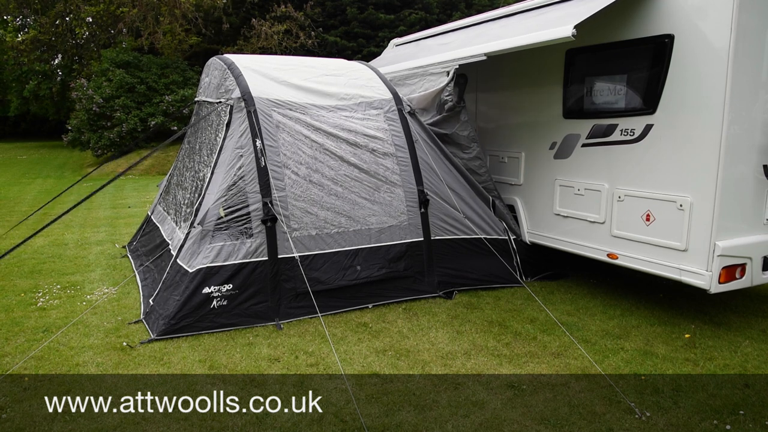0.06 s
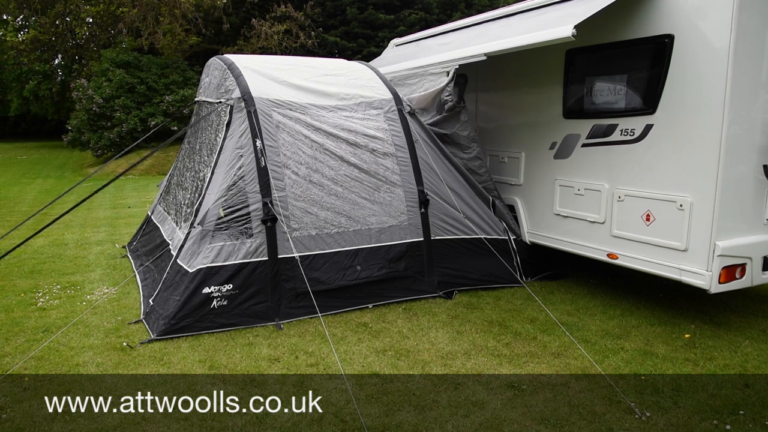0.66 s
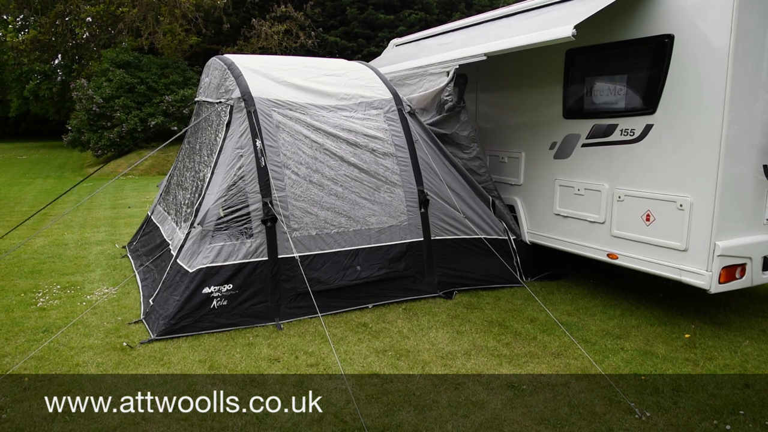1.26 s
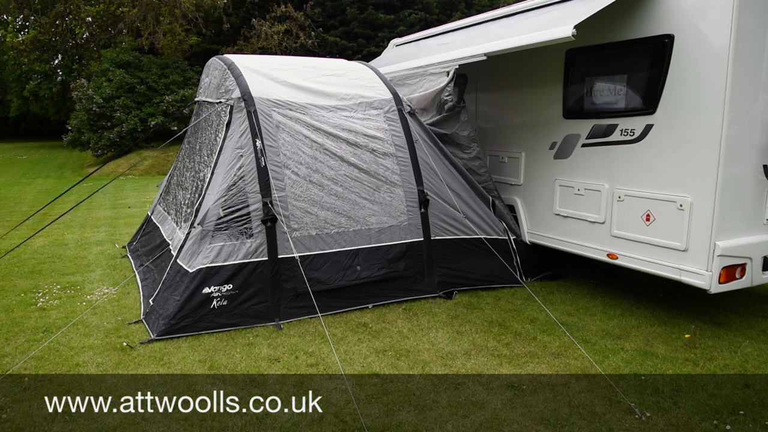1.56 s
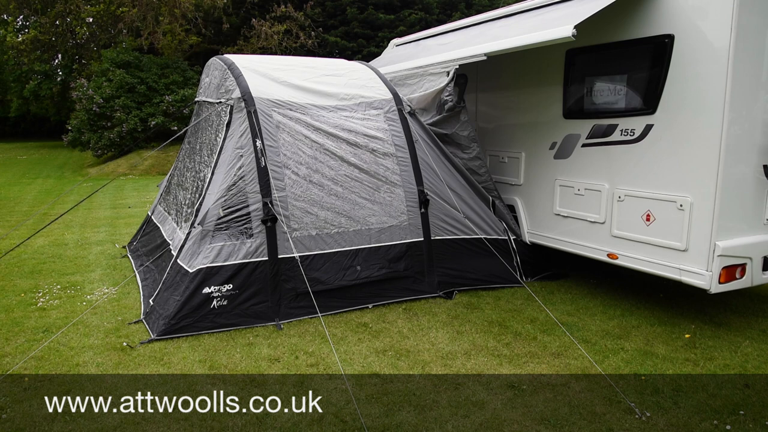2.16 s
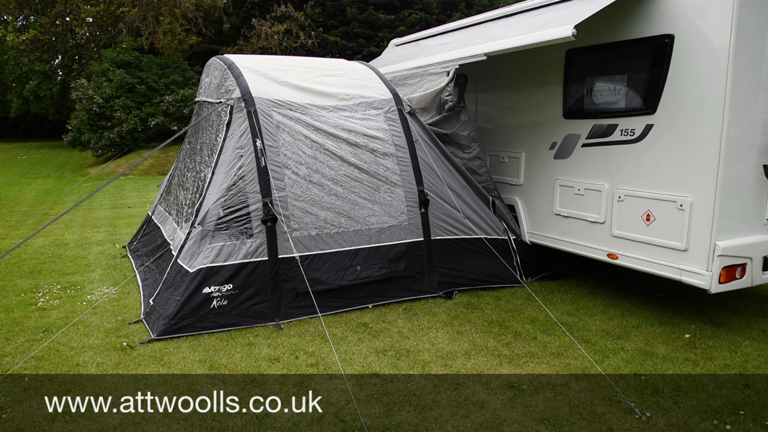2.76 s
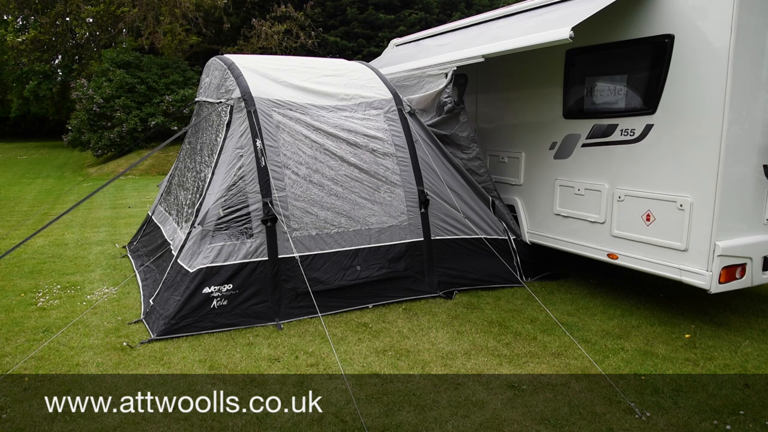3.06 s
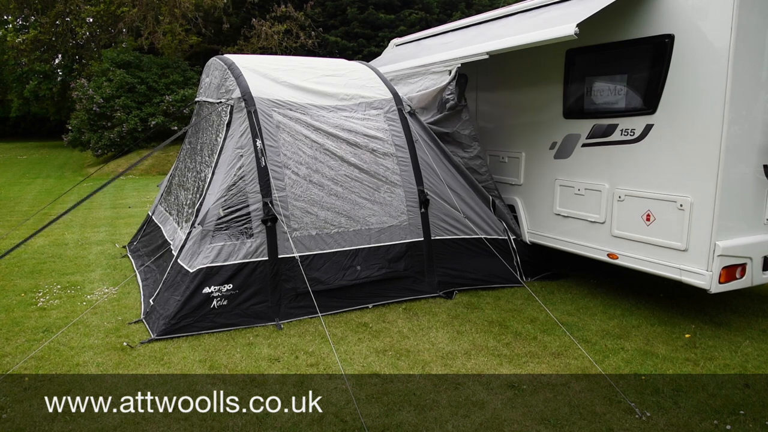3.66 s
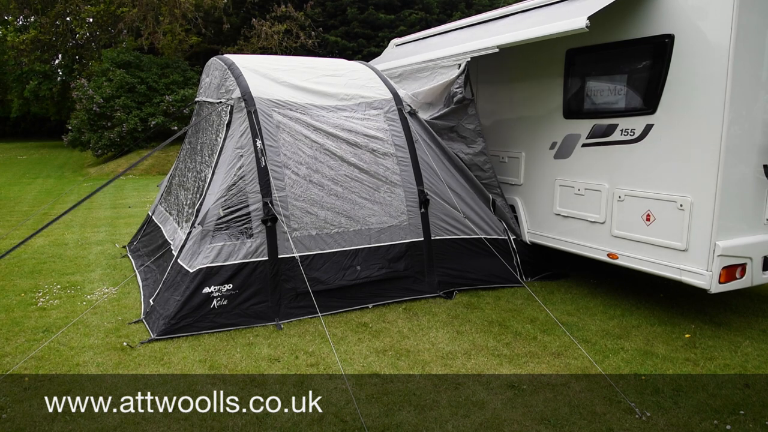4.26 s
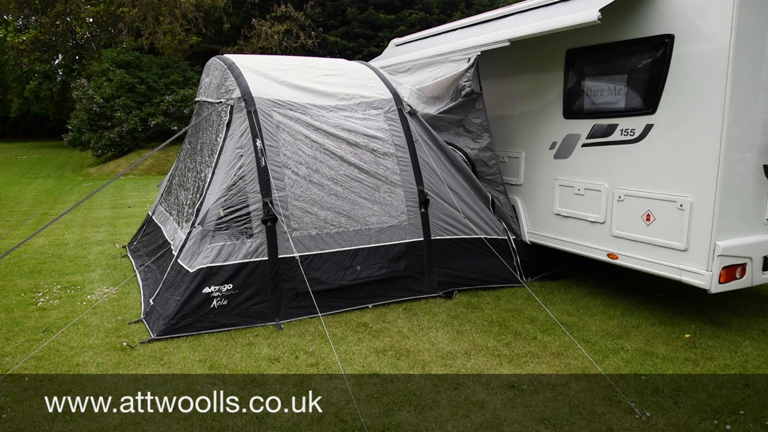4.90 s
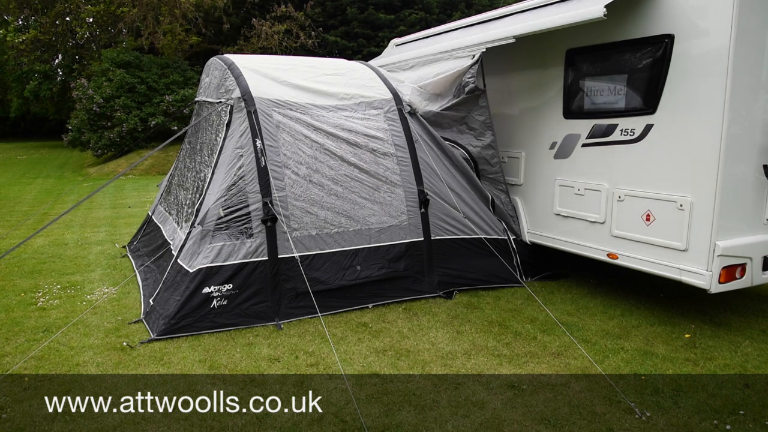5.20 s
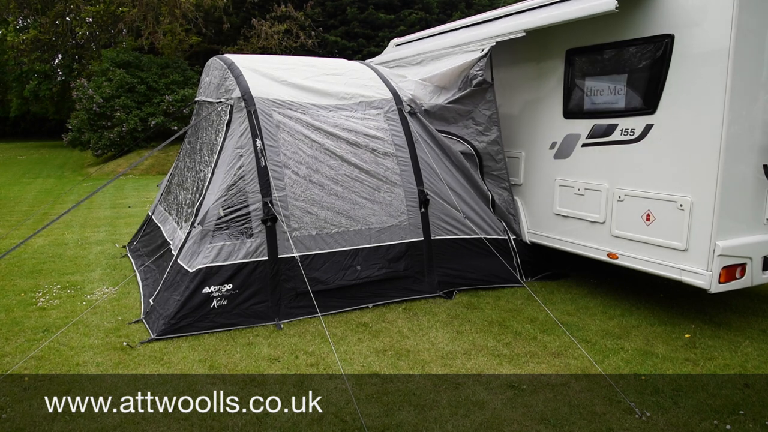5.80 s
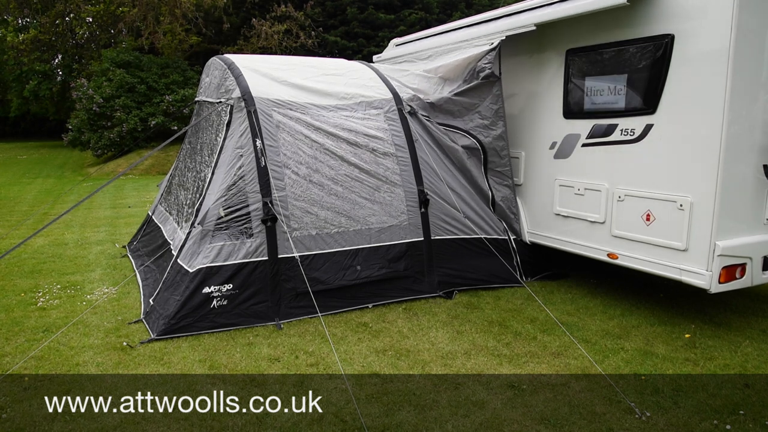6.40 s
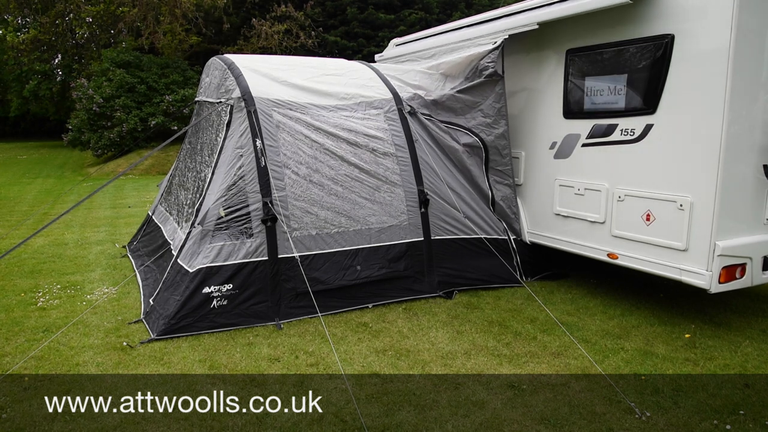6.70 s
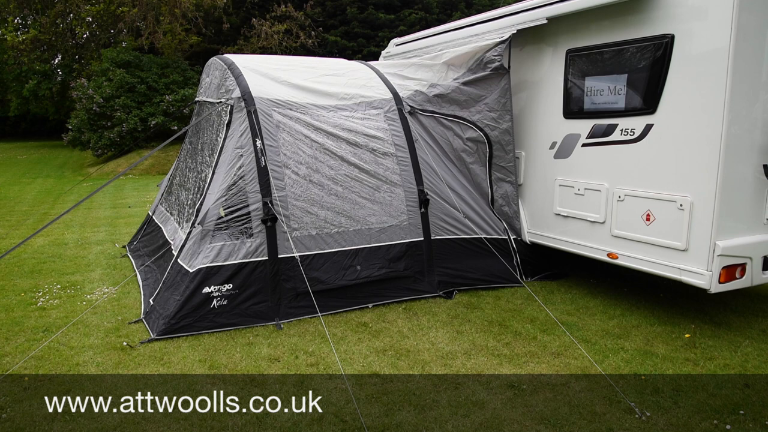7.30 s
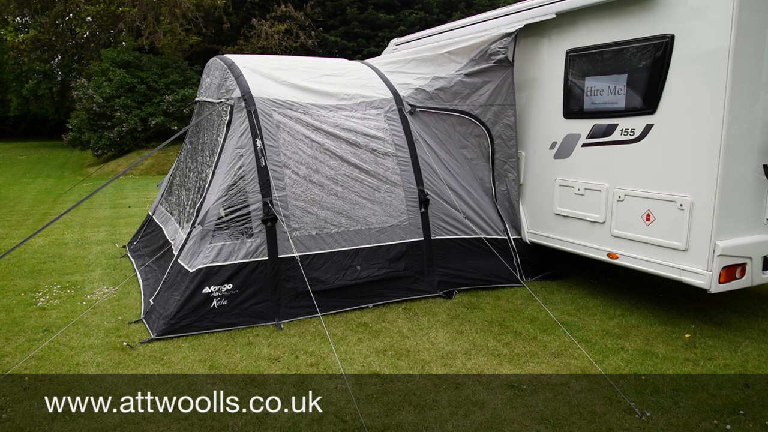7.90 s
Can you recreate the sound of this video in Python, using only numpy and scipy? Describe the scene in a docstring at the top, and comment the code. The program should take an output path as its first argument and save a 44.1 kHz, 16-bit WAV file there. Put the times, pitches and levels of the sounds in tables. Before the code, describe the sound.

A metal pole clinks and hooks on, then an awning is hand-cranked in with rhythmic clacks, grinding and rustling canvas.

```python
"""A metal crank pole clinks as it is picked up, over the faint murmur of a quiet lawn.
Its hook rattles into the eye of a caravan awning's gearbox, and the awning is wound in by hand.
At about three pushes a second, gear teeth clack and click, the gear grinds and the roller rumbles
in its case. The canvas slides and rustles, its creases snapping as they wrap round the roller."""
import sys
import numpy as np
from scipy import signal
from scipy.fft import rfft, irfft, next_fast_len
from scipy.io import wavfile
from scipy.ndimage import map_coordinates

SR = 44100
rng = np.random.default_rng(int(sys.argv[2]) if len(sys.argv) > 2 else 0)


def wrap_up_sound(samples):
    """Save the sound to the file named by the first command line argument, as 16-bit audio."""
    columns = np.atleast_2d(samples).T
    # keep every value between -1 and 1, then stretch to whole-number steps
    tamed = np.clip(columns, -1, 1)
    steps = np.round(tamed * 32767).astype(np.int16)
    wavfile.write(sys.argv[1], SR, steps)


N = 355005


def amp(db):
    return 10 ** (np.asarray(db) / 20)


def unit(x, start_s=0, end_s=None):
    """x scaled to rms 1 between two times."""
    part = x[int(start_s * SR):None if end_s is None else int(end_s * SR)]
    return x / np.sqrt(np.mean(part ** 2) + 1e-20)


def curves(rows):
    """Per-sample dB for each column after the time; -120 before the first row."""
    times_s, *columns = np.transpose(rows)
    return [np.interp(np.arange(N) / SR, times_s, column, left=-120) for column in columns]


def wobble(rate_hz):
    """Smooth random curve with rate_hz knots a second."""
    knots = rng.standard_normal(int(N * rate_hz / SR) + 4)
    return map_coordinates(knots, [np.arange(N) * rate_hz / SR])


def impulse_response(spectrum, size):
    """Minimum-phase filter through (Hz, dB) points."""
    hz, db = np.transpose(spectrum)
    gain = amp(np.interp(np.log(np.fft.rfftfreq(size, 1 / SR) + 1), np.log(hz), db))
    cepstrum = irfft(np.log(gain), size)
    cepstrum[1:size // 2] *= 2
    cepstrum[size // 2 + 1:] = 0
    return irfft(np.exp(rfft(cepstrum)))


def coloured(x, spectrum, size=4096):
    """x filtered to a spectrum."""
    return signal.fftconvolve(x, impulse_response(spectrum, size))[:len(x)]


def resonance(x, centre_hz, q):
    return signal.lfilter(*signal.iirpeak(centre_hz, q, fs=SR), x)


def fade(t, t60_s):
    return np.exp(-np.log(1000) * t / t60_s)


def swell(peak_s, rise_s, fall_s):
    """Rises to a rounded peak of 1 and dies away."""
    t = np.arange(N) / SR - peak_s
    distance = np.maximum(-t / rise_s, t / fall_s)
    return 1 / np.cosh(np.minimum(distance, 20))


def grains(rate_hz, spread_db):
    """Tiny slips at random moments, a few much larger than the rest; rms 1."""
    occurs = rng.random(N) < rate_hz / SR
    size_db = spread_db * np.minimum(rng.exponential(size=N), 4)
    sign = rng.choice([-1, 1], N)
    return unit(occurs * sign * amp(size_db))


# Spectra of a blow's crack, treble and knock. Each row: frequency in Hz, relative gain in dB.
CRACK_SPECTRUM = [(300, -26.5), (900, -20.5), (1500, 1.5), (2700, 2), (4200, -1), (5300, -7), (6500, -18),
                  (9000, -50.5)]
TREBLE_SPECTRUM = [(3500, -46.5), (5000, 6.5), (6100, 3), (7800, 2.5), (9700, -0.5), (11000, -4),
                   (12400, -1), (13600, -5.5), (16000, -13.5)]
KNOCK_SPECTRUM = [(30, -35), (70, -37), (100, -28), (135, -4), (185, -7.5), (235, 1), (310, -4.5),
                  (420, -5.5), (650, -7.5), (900, -7.5), (1300, -8.5), (2000, -13.5), (4000, -51.5)]


def metal_contacts(rows, modes, *, clank, zing, boom, snap, ping,
                   treble_t60_s, wash_t60_s, knock_t60_s, favour_db, gain_db):
    """Metal meets metal: a crack, a treble burst, the ring of the part and a knock of its mount."""
    t = np.arange(SR // 4) / SR
    attack_s, ring_s = (0, 0.004), (0.006, 0.02)  # windows in which levels are set
    blow = snap * (np.arange(len(t)) == 8)
    onset = 1 - np.exp(-t / 0.0016)
    hz, mode_db, t60_s = np.transpose(modes)
    partials = amp(mode_db)[:, None] * fade(t, t60_s[:, None]) * np.exp(2j * np.pi * hz[:, None] * t)
    high = hz > 5500
    out = np.zeros(N + SR)
    for start_s, crack_db, treble_db, ring_db, knock_db, favoured_hz, contact_s in rows:
        crack_noise, treble_noise, wash_noise, knock_noise = rng.standard_normal((4, len(t)))
        # Each struck spot excites its own share of the modes.
        scatter, phase = rng.standard_normal((2, len(modes)))
        nearness = np.exp(-(np.log(hz / favoured_hz) / 0.15) ** 2)
        share = amp(2.2 * scatter + favour_db * nearness) * np.exp(2j * np.pi * phase)
        tones = ((share * ~high) @ partials).imag
        overtones = ((share * high) @ partials).imag
        # A short contact snaps; a long one scrapes and starts softly.
        impulse = blow * 0.019 / contact_s
        touch = 1 - np.exp(-t / (0.009 * contact_s))
        contact = touch * fade(t, contact_s)
        crack = coloured(impulse + crack_noise * contact, CRACK_SPECTRUM, size=2048)
        crack += ping * resonance(crack, favoured_hz, q=7.5)
        crack = unit(crack, *attack_s) + clank * unit(tones * contact, *attack_s)

        treble_decay = fade(t, np.sqrt(contact_s * treble_t60_s)) + 0.05 * fade(t, 0.16)
        treble = coloured(impulse + treble_noise * touch * treble_decay, TREBLE_SPECTRUM, size=2048)
        hardness = amp(0.28 * min(treble_db + 44, 0))  # soft blows barely wake the highest modes
        treble = unit(treble, *attack_s) + zing * hardness * unit(overtones * touch, *attack_s)
        # The thin wall's many weak modes blur into a wash.
        wash = coloured(wash_noise * fade(t, wash_t60_s), CRACK_SPECTRUM, size=2048)
        ring = onset * (unit(tones, *ring_s) + amp(-8) * unit(wash, *ring_s))

        knock = coloured(knock_noise * onset * fade(t, knock_t60_s), KNOCK_SPECTRUM, size=2048)
        knock += boom * resonance(knock, centre_hz=238, q=7)  # hollow case

        hit = amp(crack_db) * unit(crack, *attack_s) + amp(treble_db) * unit(treble, *attack_s)
        hit += amp(ring_db) * unit(ring, *ring_s) + amp(knock_db) * unit(knock, end_s=0.02)
        out[round(start_s * SR):][:len(t)] += hit
    return amp(gain_db) * out[:N]


# Pole clinks. Each row: start in seconds, crack, treble and ring in relative dB,
# favoured pitch in Hz, contact in seconds.
POLE_HITS = [(0.0274, -58, -75.5, -76, 2000, 0.035), (0.121, -52, -77, -69.5, 1850, 0.027),
             (0.1305, -47, -73, -66, 1860, .025), (0.2976, -43, -33.5, -40.5, 1600, .018),
             (0.2992, -23.5, -30.5, -43.5, 4050, .013), (0.3235, -40.5, -54, -48.5, 2800, .028),
             (0.3456, -59, -62, -46.5, 2800, .03), (0.426, -54.5, -64.5, -71, 3150, .038),
             (0.7508, -60.5, -75, -72, 2810, 0.046), (0.9024, -40.5, -48, -70.5, 3100, 0.044),
             (0.9112, -41.5, -43.5, -56, 3040, 0.11), (1.06, -56.5, -66.5, -66.5, 4120, 0.015),
             (1.1513, -53.5, -58.5, -62, 2360, 0.079)]
# Pole modes. Each row: frequency in Hz, relative level in dB, t60 in seconds.
POLE_RING = [(520, -10.5, .04), (1275, -11.5, 0.46), (1600, -3.5, 0.06), (1650, -20, .25), (2510, -5, 0.11),
             (2769, 1.5, 0.14), (3045, -5, .08), (3230, -7.5, 0.24), (3600, -2.5, .11), (3700, -9, .06),
             (4050, -13.5, 0.05), (4770, -7.5, 0.055), (5680, -8, 0.065), (6400, -17.5, .06),
             (6530, -16, 0.078), (7050, -26.5, .07), (7900, -25, .05), (9300, -1.5, 0.017),
             (10800, -12, 0.037), (12600, -14.5, .04), (13180, -12.5, .03)]


def pole():
    """The loose pole clinks as it is picked up; the hand damps its knock and it radiates no bass."""
    rows = []
    for start_s, crack_db, treble_db, ring_db, favoured_hz, contact_s in POLE_HITS:
        knock_db = -60.5 + 0.19 * (crack_db + 40)
        rows.append((start_s, crack_db, treble_db, ring_db, knock_db, favoured_hz, contact_s))
    clinks = metal_contacts(
        rows, POLE_RING, clank=1.3, zing=0.9, boom=0.1, snap=2, ping=0.5,
        treble_t60_s=0.012, wash_t60_s=0.09, knock_t60_s=0.039, favour_db=14, gain_db=-1)
    return signal.sosfilt(signal.butter(2, 570, "high", fs=SR, output="sos"), clinks)


# Outdoor air. Each row: frequency in Hz, relative gain in dB.
AIR_SPECTRUM = [(25, -37), (50, -43), (79, -21.5), (100, -14.5), (125, -6.5), (165, -3), (235, -0.5),
                (310, -7), (650, -11), (1050, -11), (1700, -20.5), (3000, -29), (8000, -41), (15500, -42.5)]


def outdoors():
    """Distant, steady murmur of air and trees."""
    level_db = -60.5 + 0.6 * wobble(rate_hz=4)
    return amp(level_db) * unit(coloured(rng.standard_normal(N), AIR_SPECTRUM))


# Rubs of pole and cloth. Each row: peak in seconds, slide and rustle in relative dB, fall in seconds.
CLOTH_RUBS = [(0.05, -69, -82, 0.073), (0.47, -70, -73.5, 0.22), (1.152, -74, -77, 0.16),
              (2.151, -62, -76, .025), (2.265, -51, -63.5, 0.04), (2.48, -73.5, -80, 0.29),
              (2.789, -61, -68, 0.029), (3.006, -52.5, -57, 0.056)]
# Canvas drawn in. Each row: time in seconds, slide and rustle in relative dB.
CLOTH_LEVELS = [(3.3, -70, -74), (3.48, -61.5, -63.5), (4.08, -57, -62), (4.6, -62.5, -66),
                (5.8, -59.5, -67.5), (6.55, -62.5, -69.5), (6.97, -69, -68.5), (7.6, -59.5, -73.5),
                (8.05, -67, -76)]
# Swish of smooth cloth and snapping of creases. Each row: time in seconds, relative level in dB.
SWISH_LEVELS = [(2.38, -100), (2.46, -73), (2.58, -70), (2.68, -80), (2.73, -59.5), (2.77, -78),
                (2.85, -100)]
CREASE_LEVELS = [(3.3, -61), (3.7, -66.5), (4.7, -64.5), (5.6, -67.5), (6.07, -60), (6.6, -62.5),
                 (6.95, -70.5), (7.2, -64), (7.85, -62.5), (8.05, -74)]
# Cloth spectra. Each row: frequency in Hz, relative gain in dB.
SLIDE_SPECTRUM = [(700, -42.5), (1400, 3), (1900, 7.5), (2700, 1.5), (3800, -2.5), (5000, -8.5),
                  (7000, -24), (11000, -29)]
RUSTLE_SPECTRUM = [(2500, -3), (5500, 7.5), (7500, 2.5), (10000, -0.5), (12500, -4), (14500, -16.5),
                   (16000, -15)]
SWISH_SPECTRUM = [(5000, -33.5), (8000, -5), (10000, -3.5), (11000, 1), (11700, -3), (12500, 0.5),
                  (13400, 3), (16000, -2.5)]
CREASE_SPECTRUM = [(1200, -45), (2200, 5), (3300, 6), (4300, 3), (5000, -4.5), (6400, -3.5), (9000, -11.5),
                   (11200, -7.5), (13500, -14), (16000, -16)]


def canvas(roller_db):
    """Canvas slides, rustles and swishes; its creases crackle as it wraps round the roller."""
    pull_db = 0.19 * np.clip(roller_db + 45.5, -8, 8) + stall_db()  # each push drags more cloth in
    slide_gain, rustle_gain = amp(curves(CLOTH_LEVELS)) * amp(0.5 * pull_db)
    for peak_s, slide_db, rustle_db, fall_s in CLOTH_RUBS:
        rub = swell(peak_s, rise_s=0.016, fall_s=fall_s)
        slide_gain += amp(slide_db) * rub
        rustle_gain += amp(rustle_db) * rub
    flutter_db = 2.2 * wobble(rate_hz=21)
    flutter = amp(flutter_db - 2.5)
    slide = slide_gain * flutter * unit(coloured(rng.standard_normal(N), SLIDE_SPECTRUM))
    rustle = rustle_gain * flutter * unit(coloured(rng.standard_normal(N), RUSTLE_SPECTRUM))

    swish_db, = curves(SWISH_LEVELS)
    swish = amp(swish_db + flutter_db) * unit(coloured(rng.standard_normal(N), SWISH_SPECTRUM))

    crease_db, = curves(CREASE_LEVELS)
    snaps = np.abs(grains(rate_hz=130, spread_db=3.1))
    bursts = signal.fftconvolve(snaps, fade(np.arange(SR // 25) / SR, t60_s=0.011))[:N]
    crackle = unit(coloured(bursts * rng.standard_normal(N), CREASE_SPECTRUM))
    return slide + rustle + swish + amp(crease_db + pull_db) * crackle


# Hook on eye. Each row: start in seconds, crack, treble, ring and knock in relative dB,
# favoured pitch in Hz.
HOOK_HITS = [(1.8214, -45, -61, -45.5, -43, 1240), (1.8392, -38.5, -51, -53, -44, 3060),
             (1.8547, -46, -56, -51.5, -43.5, 3200), (1.9366, -41.5, -63, -50, -48.5, 2720),
             (1.965, -39.5, -59, -61, -53, 4120), (1.9775, -37, -54, -55, -42, 2310),
             (1.9886, -40, -51.5, -46.5, -53, 3020), (2.1469, -51, -72, -62, -49.5, 2000),
             (2.1602, -31, -47.5, -49, -42.5, 2920), (2.1743, -34, -42, -39, -55, 3380),
             (2.1832, -38, -47, -49, -46, 3900), (2.2743, -43, -56, -45, -47.5, 2590),
             (2.2866, -33.5, -45, -42.5, -38.5, 3230), (2.2922, -34, -42, -61, -59, 3250),
             (2.4463, -47, -59.5, -64, -56.5, 3000), (2.7668, -26, -40.5, -50.5, -55, 2620),
             (2.8945, -37.5, -59, -73, -70, 2560)]
# Hook modes. Each row: frequency in Hz, relative level in dB, t60 in seconds.
HOOK_RING = [(760, -10, 0.56), (997, -2.5, 0.15), (1247, 0.5, .1), (1320, -13, 0.34), (1671, 0, 0.1),
             (2660, -6, 0.077), (3200, 2, 0.079), (3960, 3.5, 0.053), (4970, -19, 0.048),
             (5580, -13, 0.048), (5930, -18, .05), (7380, -19.5, 0.08), (10100, -10, 0.017)]


def hook(contact_s=0.028):
    """The hook rattles into the eye of the gearbox and knocks the case."""
    rows = [(*hit, contact_s) for hit in HOOK_HITS]
    return metal_contacts(
        rows, HOOK_RING, clank=0.37, zing=0.92, boom=0.69, snap=12, ping=1.0,
        treble_t60_s=0.1, wash_t60_s=0.17, knock_t60_s=0.21, favour_db=10, gain_db=-2)


# Handle pushes. Each row: time in seconds, roller, grind and clack in relative dB.
HANDLE_PUSHES = [(2.4223, -57, -61, -56), (2.61, -54, -60, -66), (2.9102, -69, -53, -46.5),
                 (3.0227, -49, -53, -46), (3.34, -49.5, -49, -46), (3.4215, -39, -40.5, -41),
                 (3.8309, -44.5, -45, -44), (4.1643, -46.5, -48.5, -44), (4.4783, -43, -46.5, -43.5),
                 (4.8258, -49, -43, -43), (5.1732, -44, -49.5, -45.5), (5.4818, -44, -47.5, -46.5),
                 (5.7945, -44.5, -51, -44.5), (6.1054, -45, -48, -38.5), (6.4135, -43, -56, -45.5),
                 (6.912, -53, -53, -58), (7.2, -47.5, -48, -62), (7.535, -44, -51.5, -49),
                 (7.8167, -52, -51.5, -56)]
# Further gear clicks, some of them rebounds a moment after a clack. Each row: start in seconds, crack, treble
# and ring in relative dB, favoured pitch in Hz, contact in seconds.
GEAR_CLICKS = [(3.3126, -46, -70, -66, 3320, .02), (3.339, -40, -67, -63, 3370, 0.024),
               (3.3693, -38.5, -59, -68, 2840, 0.0063), (3.3967, -38, -68, -54, 3000, 0.054),
               (3.4168, -27.5, -33.5, -51, 2900, 0.076), (3.4209, -26.5, -35, -43, 4380, 0.018),
               (3.467, -36, -37.5, -53, 2350, 0.025), (3.5166, -34.5, -41, -64, 3480, 0.014),
               (3.5204, -40.5, -48, -46, 2620, 0.043), (3.589, -47.5, -64, -74, 2660, 0.033),
               (3.6617, -46, -69, -67, 2060, .012), (4.311, -45, -70, -72, 2760, 0.014),
               (4.3978, -42, -60, -57, 2100, 0.02), (4.5123, -39, -57, -49.5, 2660, .029),
               (4.833, -44, -60, -47, 1350, .028), (4.9055, -50, -62, -74, 2670, 0.02),
               (4.9627, -48, -64, -73, 1910, 0.037), (5.0416, -47.5, -75, -70, 2460, 0.034),
               (5.2494, -40, -59, -57, 3370, .017), (5.317, -51, -72, -71, 2400, 0.014),
               (5.3524, -48.5, -65, -62, 2350, 0.021), (5.5581, -43, -62, -67, 2830, 0.038),
               (5.6318, -47.5, -62, -75, 2220, .019), (5.9079, -43.5, -66, -56, 1500, 0.018),
               (5.9345, -41.5, -66, -77, 3980, 0.0049), (6.1253, -38, -53, -52, 2080, 0.0043),
               (6.1787, -34.5, -47, -52, 2900, 0.033), (6.2371, -45, -60, -75, 2180, .021),
               (6.43, -34.5, -57, -69, 3400, 0.0072), (6.5407, -41, -62, -64, 3650, 0.0062),
               (6.644, -48, -59, -74, 2000, 0.084), (6.7624, -49, -60, -71, 2070, .028),
               (6.8004, -35, -40.5, -66, 3560, 0.07), (6.907, -56, -55, -72, 2000, .032),
               (6.935, -45.5, -56, -72, 3700, .04), (7.0485, -45, -62, -70, 3640, 0.013),
               (7.184, -45.5, -51.5, -56.5, 2740, .022), (7.359, -45, -72, -76, 3900, 0.012),
               (7.4074, -40.5, -49.5, -76, 2130, 0.032), (7.5524, -40, -66, -67, 2150, 0.0072),
               (7.691, -53, -63, -77, 2380, .03), (7.8144, -59, -56, -64, 2090, 0.028)]
# Gear modes. Each row: frequency in Hz, relative level in dB, t60 in seconds.
GEAR_RING = [(1318, 3, 0.14), (1637, 3, 0.041), (2154, 3, 0.1), (2350, -5, 0.074), (2550, 5, 0.067),
             (2900, -1, 0.072), (3270, -2, 0.089), (4050, -5, 0.04), (3925, 10.5, 0.054), (4820, -6, 0.046),
             (6240, -5, 0.027), (7000, -35, 0.03), (8560, -5, 0.023), (10800, -31, .03),
             (11200, -17, 0.043), (12700, -47, 0.031), (12300, -6, 0.052), (13400, -42, 0.027)]


def gear(clack_hz=1500, clack_s=0.027, rebound_s=0.02, rebound_db=-10):
    """A tooth clacks dully and bounces once at each push; in between, the gear clicks sharply."""
    teeth = [(start_s, db) for start_s, _, _, db in HANDLE_PUSHES]
    rebounds = [(start_s + rebound_s, db + rebound_db) for start_s, db in teeth]
    clacks = [(start_s, db, db - 14.5, db - 12, db - 4, clack_hz, clack_s)
              for start_s, db in teeth + rebounds]
    clicks = [(start_s, crack_db, treble_db, ring_db, crack_db - 14, favoured_hz, contact_s)
              for start_s, crack_db, treble_db, ring_db, favoured_hz, contact_s in GEAR_CLICKS]
    return metal_contacts(
        clacks + clicks, GEAR_RING, clank=0.35, zing=0.65, boom=0.5, snap=11, ping=1.1,
        treble_t60_s=0.034, wash_t60_s=0.16, knock_t60_s=0.077, favour_db=12.5, gain_db=-1.6)


# Drag between pushes. Each row: time in seconds, roller and grind in relative dB.
DRAG_LEVELS = [(3.3, -50, -50), (3.54, -51.5, -55), (4.89, -54, -55.5), (5.26, -55, -52),
               (6.94, -53.5, -54), (7.33, -51, -53.5), (7.67, -57.5, -52.5), (8.05, -55, -57)]


def effort_db(lag_s=0.01):
    """Roller and grind levels: steady drag plus a swell that peaks just after each clack."""
    roller_power, grind_power = (amp(db + 0.5) ** 2 for db in curves(DRAG_LEVELS))
    for push_s, roller_db, grind_db, _ in HANDLE_PUSHES:
        roller_power += (amp(roller_db) * swell(push_s + lag_s, rise_s=0.04, fall_s=0.05)) ** 2
        grind_power += (amp(grind_db) * swell(push_s + lag_s, rise_s=0.016, fall_s=0.03)) ** 2
    return 10 * np.log10([roller_power, grind_power]) + stall_db()


# Roller and gear spectra. Each row: frequency in Hz, relative gain in dB.
ROLLER_SPECTRUM = [(25, -44), (60, -32.5), (95, -24.5), (130, -8.5), (155, -11), (185, 0), (235, 1.5),
                   (310, -4.5), (400, -3.5), (520, -9.5), (750, -15), (1500, -48.5)]
GRIND_SPECTRUM = [(250, -35), (400, -5.5), (540, -2.5), (720, 0), (890, 1.5), (1080, -2.5), (1300, -3),
                  (1700, -12.5), (2400, -13), (5000, -44.5)]


def winding(roller_db, grind_db):
    """The gear grinds in dense little slips and the roller rumbles in its case."""
    gear_friction = grains(rate_hz=900, spread_db=2.5) + 0.8 * rng.standard_normal(N)
    roller_friction = grains(rate_hz=500, spread_db=2.0) + rng.standard_normal(N)
    grind = amp(grind_db) * unit(coloured(gear_friction, GRIND_SPECTRUM))
    rumble = amp(roller_db) * unit(coloured(roller_friction, ROLLER_SPECTRUM))
    uneven_db = 0.93 * wobble(rate_hz=16)
    return amp(uneven_db - 2) * (rumble + grind)


def stall_db(centre_s=5.9, width_s=0.047):
    """The level dips as the hand stops for a moment."""
    return -12 * np.exp(-((np.arange(N) / SR - centre_s) / width_s) ** 2)


def scene():
    """Crank, roller and canvas, driven by one hand, over the quiet lawn; mono."""
    roller_db, grind_db = effort_db()
    awning = pole() + hook() + gear() + winding(roller_db, grind_db) + canvas(roller_db)
    return (awning + outdoors())[None]


def record(dry, cutoff_hz=15950, edge_hz=350):
    """Steep low-pass with a rounded edge."""
    size = next_fast_len(N + SR // 2)
    ramp = np.clip((cutoff_hz - np.fft.rfftfreq(size, 1 / SR)) / edge_hz + 0.5, 0, 1)
    return irfft(rfft(dry, size) * np.sin(np.pi / 2 * ramp) ** 2, size)[..., :N]


dry = scene()
out = record(dry)
wrap_up_sound(out)
```